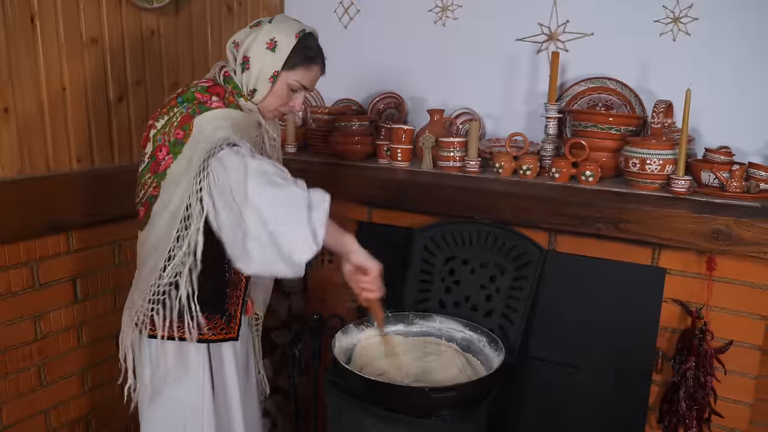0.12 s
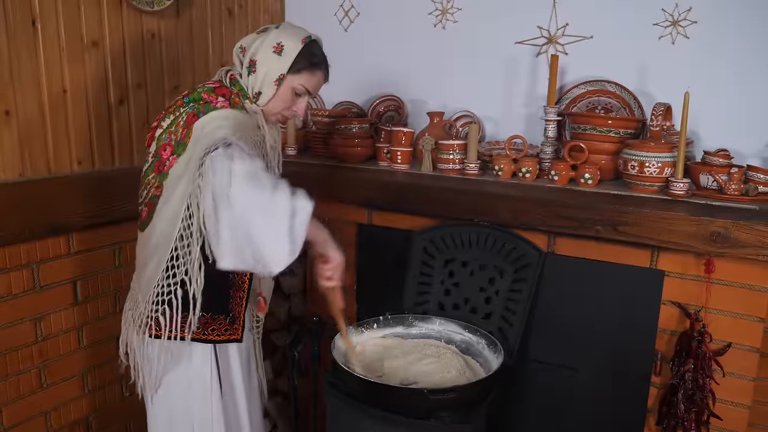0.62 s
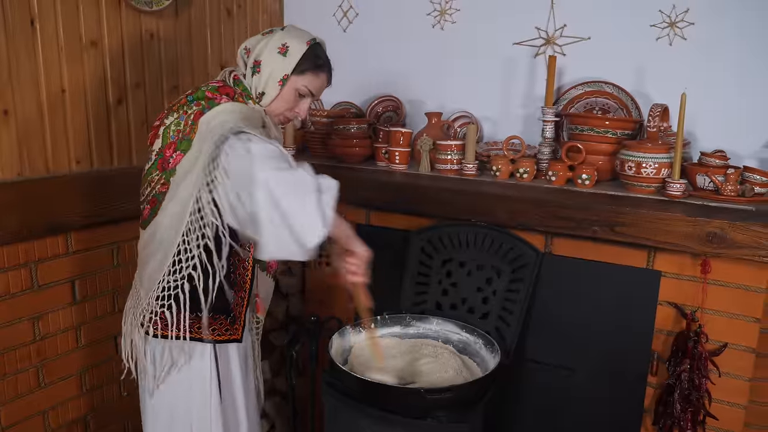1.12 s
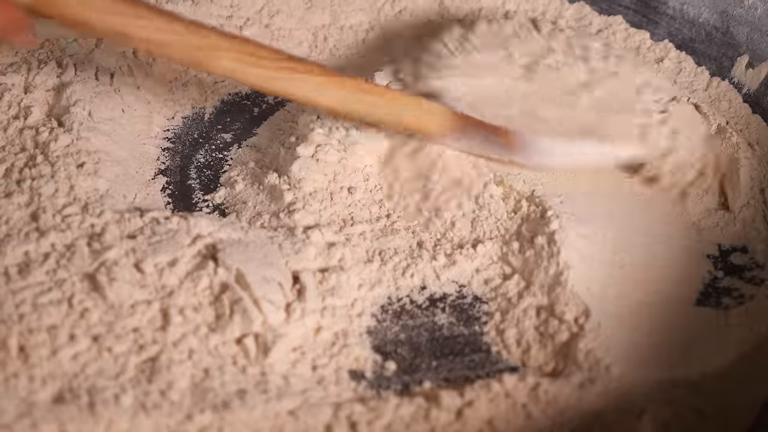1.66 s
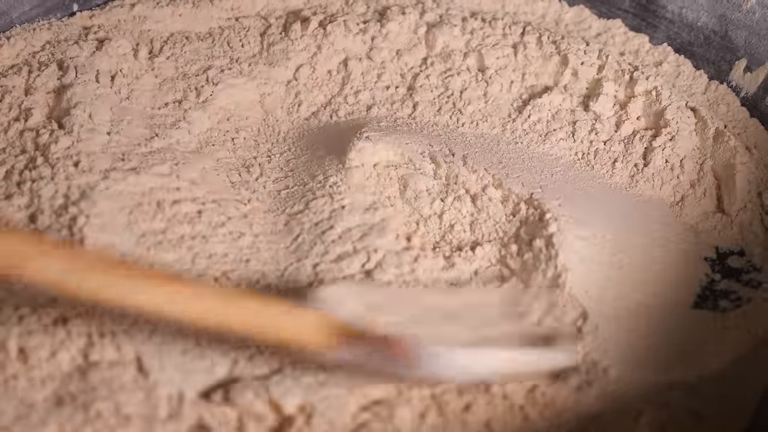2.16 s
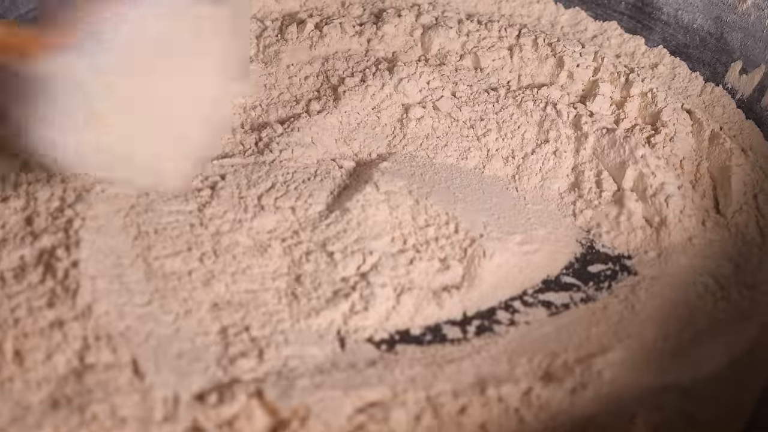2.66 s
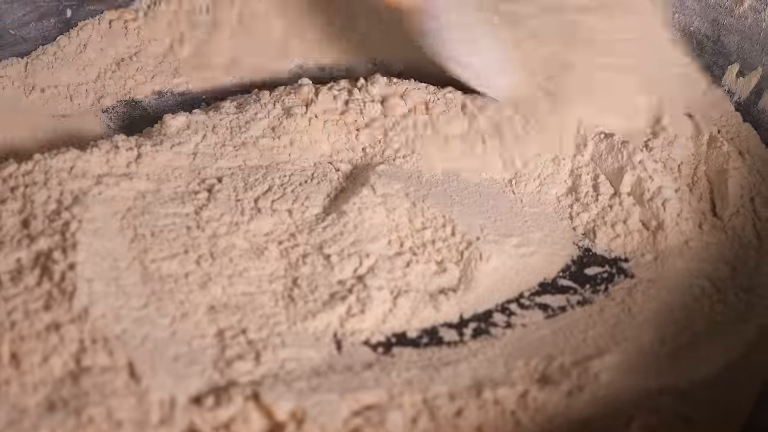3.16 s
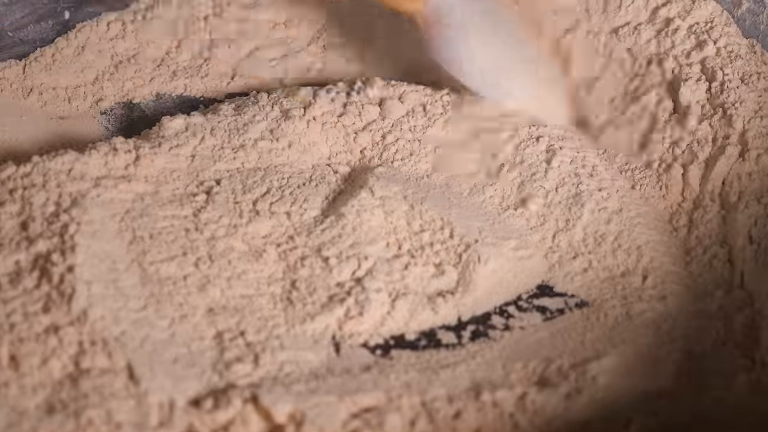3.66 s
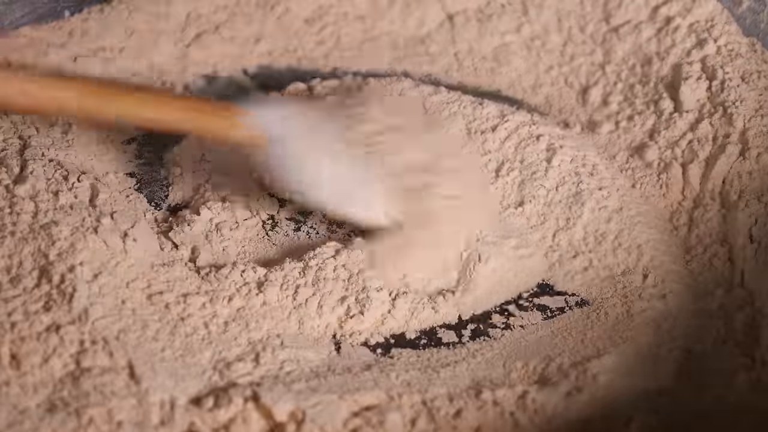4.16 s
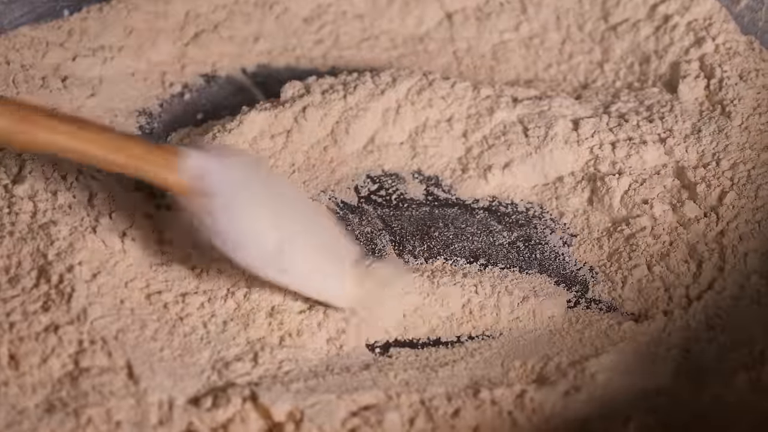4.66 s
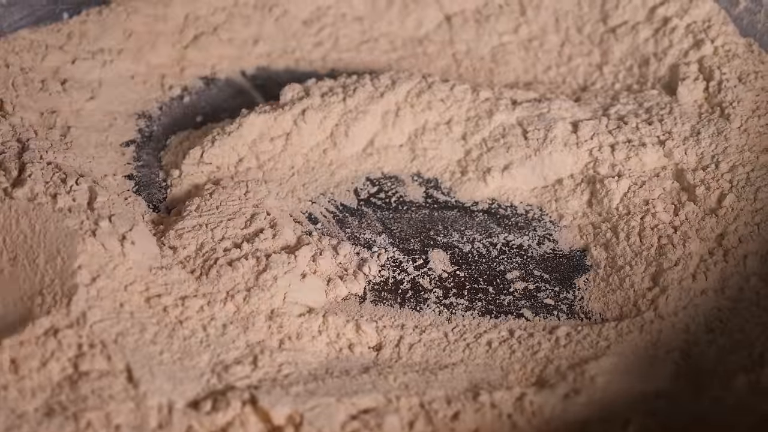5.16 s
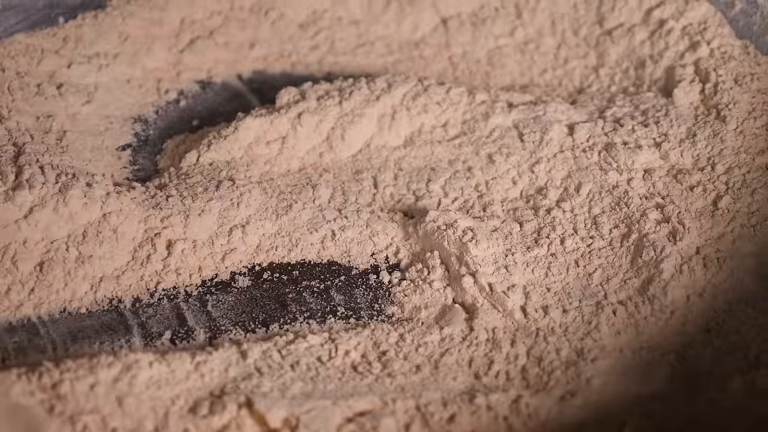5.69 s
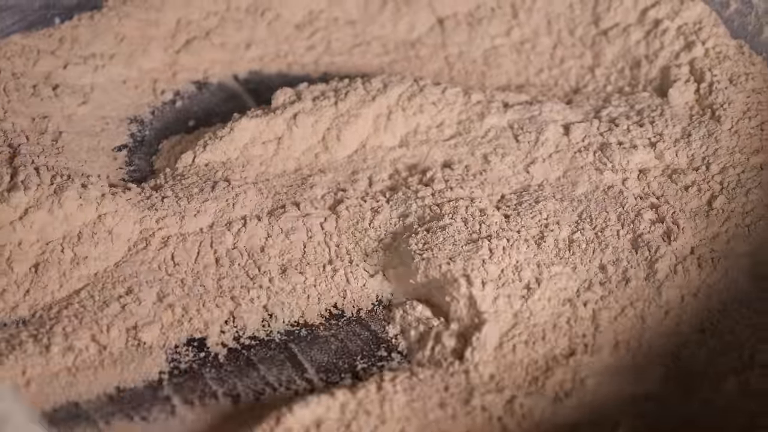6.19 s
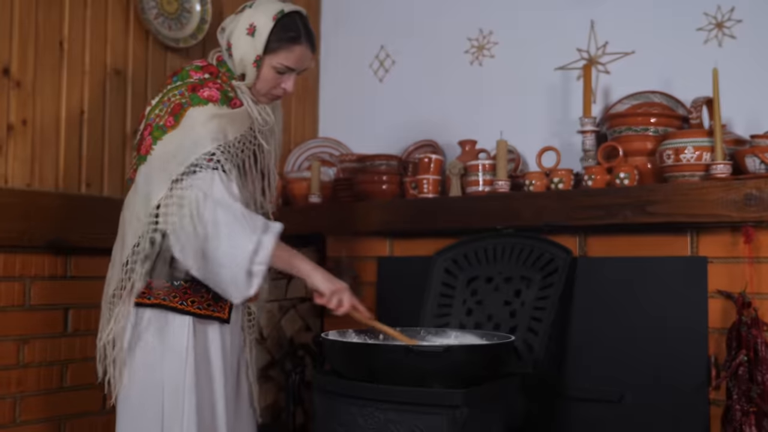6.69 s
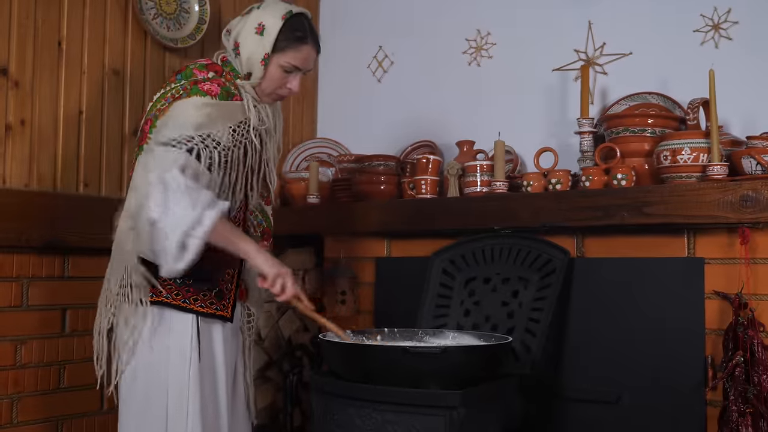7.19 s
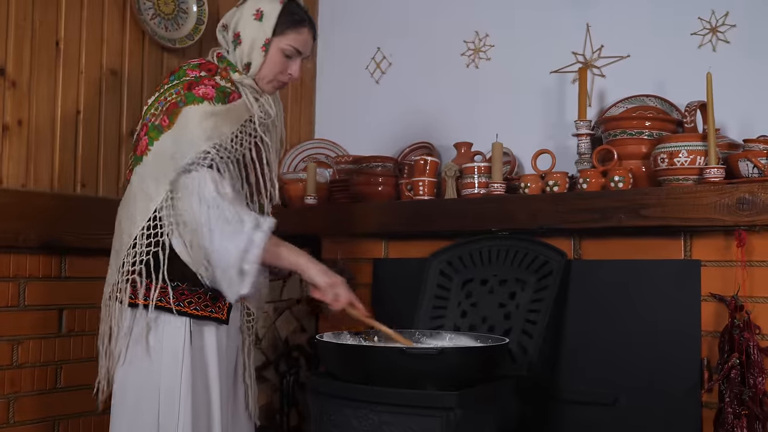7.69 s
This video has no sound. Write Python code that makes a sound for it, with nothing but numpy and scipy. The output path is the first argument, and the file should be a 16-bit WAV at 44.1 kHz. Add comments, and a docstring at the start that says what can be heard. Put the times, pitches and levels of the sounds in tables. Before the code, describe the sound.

A wooden spoon stirs dry flour in a wide iron pan, heard close in a quiet kitchen. Muted rasping strokes begin, break off briefly, then resume faintly. Before three seconds a hard hollow knock starts a louder run of gritty scrapes. Sharp knocks and juddering drags follow after five seconds, each trailing a thin metallic ring, before the stirring softens.

```python
"""In a quiet kitchen a wooden spoon stirs dry flour in a wide iron pan. Knocks and stick-slip judder ring the
damped modes of spoon and pan; the edge rasps on the iron. Crushed flour hisses as coloured noise, and a few
thin wall tones ring on when the spoon leaves bare iron. Crumbs tick, a sparse echo follows the pan and faint
room noise lies beneath; once, for a moment, the pan and its echo fall silent."""
import sys
import numpy as np
from scipy import signal
from scipy.fft import rfft, irfft
from scipy.io import wavfile
from scipy.ndimage import uniform_filter1d

SR = 44100
rng = np.random.default_rng(int(sys.argv[2]) if len(sys.argv) > 2 else 0)


def digitize_waveform(pressure):
    """Quantize a signal to 16-bit integers and store it at the path in sys.argv[1].

    Rows of a 2-D input are taken as channels; values are limited to [-1, 1].
    """
    field = np.atleast_2d(pressure).T
    bounded = np.clip(field, -1, 1)
    quanta = np.round(bounded * 32767).astype(np.int16)
    wavfile.write(sys.argv[1], SR, quanta)


def invert_db(level):
    """Linear amplitude ratio for a level in decibels (20 dB per decade), elementwise."""
    return 10 ** (np.asarray(level, dtype=float) / 20)


N = 344862

# damped low modes of spoon and pan: (frequency [Hz], relative level [dB], t60 [s])
BODY_MODES = [(170, -4.5, 0.061), (242, -0.5, 0.04), (361.6, 3, 0.037), (487, 2.5, 0.037), (659, 2, 0.023),
              (818, 3.5, 0.013), (1016, 5.5, 0.017), (1180, 2, 0.016)]


def evened(x):
    """Normalisation of power: scales to rms 1."""
    return x / np.sqrt(np.mean(x ** 2) + 1e-20)


def read(points, hz):
    """Interpolates a spectrum on a log-frequency axis, as pitch is heard."""
    f, value = np.transpose(points)
    return np.interp(np.log(hz + 1), np.log(f + 1), value)


def peaks_db(peaks, hz):
    """Resonance curves: bell-shaped lifts of a spectrum."""
    return sum(db / (1 + (2 * (hz - f) / width) ** 2) for f, width, db in peaks)


def ring(x, hz, t60):
    """One damped oscillator (two-pole resonator); steady white noise of rms 1 comes out at rms 1."""
    r = 10 ** (-3 / (t60 * SR))
    turn = 2 * np.pi * hz / SR
    gain = np.sin(turn) * np.sqrt(2 - 2 * r * r)
    return signal.lfilter([0, gain], [1, -2 * r * np.cos(turn), r * r], x)


def contact(x, width_s):
    """Contact compliance: wood gives a little, so each click becomes a soft push."""
    push = np.hanning(round(width_s * SR) + 2)
    push = push / push.sum() * np.ones(x.shape[:-1] + (1,))
    return signal.oaconvolve(x, push, axes=-1)[..., :N]


def thin(x, hz):
    """Inefficient radiation at long wavelengths: a small pan radiates no deep bass."""
    return signal.sosfilt(signal.butter(4, hz, "high", fs=SR, output="sos"), x)


def wander(span_s):
    """Low-pass random process: slow chance of rms 1."""
    steps = rng.standard_normal(N // 128 + 2)
    width = max(round(span_s * SR / 128), 1)
    smooth = uniform_filter1d(uniform_filter1d(steps, width), width)
    return np.interp(np.arange(N) / 128, np.arange(len(steps)), evened(smooth))


def coloured(gain_db, patchy_db, flicker_db):
    """Filtered noise: random short-time spectra with drifting patches and a flicker shared by all pitches."""
    frames = N // 128 + 5
    real, imaginary, patches = rng.standard_normal((frames, 257, 3)).T
    patches = evened(uniform_filter1d(uniform_filter1d(patches, 5, axis=0), 20, axis=1))
    flicker = evened(uniform_filter1d(rng.standard_normal(frames), size=2))
    level_db = gain_db[:, None] + patchy_db * patches + flicker_db * flicker
    spectra = (real + 1j * imaginary) * invert_db(level_db)
    return evened(signal.istft(spectra, nperseg=512, noverlap=384)[1][:N])


def air():
    """Coloured noise: faint room and microphone noise, swaying slightly in level."""
    # noise spectrum: (frequency [Hz], relative density [dB per Hz])
    spectrum = [(12, -44), (20, 10), (37, -20), (53, -2.5), (74, 1), (134, -4.5), (172, -3.5), (255, -9),
                (738, -16), (1000, -15.5), (1220, -19.5), (14700, -33), (16000, -47)]
    # faint fuzzy bands: (frequency [Hz], width [Hz], lift [dB])
    murk = [(60.6, 22, 5.5), (83.5, 36, 1.5), (128, 16, 4.5), (2880, 180, 3)]
    level_db, sway_db = -57, 1.8
    hz = np.fft.rfftfreq(N, 1 / SR)
    gain = invert_db(read(spectrum, hz) + peaks_db(murk, hz))
    noise = evened(irfft(rfft(rng.standard_normal(N)) * gain, N))
    return invert_db(level_db + sway_db * wander(0.081)) * noise


def kitchen(x):
    """Diffuse reverberation: sparse reflections of random sign, dying away and duller than the direct sound."""
    t60_s, spacing = 0.23, 22  # spacing in samples
    taps, at = np.zeros(SR // 2), np.arange(200, SR // 2 - spacing, spacing)
    signs = rng.choice([-1., 1.], len(at))
    taps[at + rng.integers(0, spacing, len(at))] = signs * invert_db(-60 * at / SR / t60_s)
    taps = signal.lfilter([1], [1, -.5], taps)
    return signal.oaconvolve(x, taps / np.linalg.norm(taps))[:N]


def ticks():
    """Impact noise of falling crumbs: each tick is a broad, quickly decaying burst."""
    # dry ticks: (time [s], level [dB], centre [Hz])
    crumbs = [(0.1044, -42, 2010), (1.3474, -47.5, 3360), (2.495, -32, 3190), (2.5114, -50, 2590),
              (2.6725, -52, 6230), (5.074, -52, 4900), (5.0844, -53, 3210), (5.1038, -51.5, 4020),
              (5.1555, -55, 2020), (5.5933, -43, 2900), (5.659, -24, 2300)]
    out, t = np.zeros(N), np.arange(300) / SR
    bursts = rng.standard_normal((len(crumbs), len(t)))
    for (s, db, hz), burst in zip(crumbs, bursts):
        decay = invert_db(db - 5.5 - 60 * t / .012)
        out[round(s * SR):][:len(t)] += decay * ring(burst, hz, t60=2.1 / hz)
    return out


def bump():
    """Heavily damped oscillation: one soft low tone that dies at once."""
    start_s, level_db, hz, t60_s = 2.512, -42, 170, .14
    t = np.maximum(np.arange(N) / SR - start_s, 0)
    onset = np.minimum(t / 0.0035, 1)
    return invert_db(level_db - 60 * t / t60_s) * np.sin(2 * np.pi * hz * t) * onset


def wall():
    """Free modal decay: as the spoon leaves bare iron, thin tones swell in and die until they are damped."""
    # modes of the pan's free wall: (frequency [Hz], relative level [dB], t60 [s])
    wall_modes = [(322, -3, 1.2), (495, 0.5, 0.2), (646, -10, 0.39), (694, -1.5, 0.74), (720, -4, 0.43),
                  (980, -11.5, 1.44), (1020, -9, 0.17), (1370, 5, 0.2), (1610, 1, 0.46), (1715, 3, 0.3),
                  (1803, -5, 0.5)]
    # spoon leaves the iron: (time [s], level [dB], favoured mode [Hz], its lift [dB], damped at [s])
    lifts = [(4.9, -59, 694, 1, 5.19), (5.39, -47.5, 980, 14, 5.72), (5.921, -44, 694, 5.5, 6.21),
             (6.44, -46, 495, 17, 6.6)]
    out = np.zeros(N)
    for s, db, favoured_hz, lift_db, end in lifts:
        t = np.arange(round((end - s) * SR)) / SR
        tones = np.zeros(len(t))
        for hz, mode_db, t60 in wall_modes:
            favour_db = lift_db / (1 + ((hz - favoured_hz) / 20) ** 2)
            decay = invert_db(mode_db + favour_db - 60 * t / t60)
            tones += decay * np.sin(2 * np.pi * (hz * t + rng.random()))
        fade = np.minimum(1, np.minimum(t / 0.0085, (t[-1] - t) / 0.0046))
        out[round(s * SR):][:len(t)] += invert_db(db) * tones * fade
    return out


def powder(coarse, fine, cracks):
    """Granular friction: flour crushed under the edge gives coarse and fine hiss, and a dull puff at each crack."""
    # hiss spectrum: (frequency [Hz], relative density [dB per Hz])
    spectrum = [(880, -34.5), (1500, -2.5), (2120, -1.5), (2610, -14.5), (4080, -4), (4780, -6.5),
                (8920, -14.5), (12100, -18.5), (16000, -22)]
    # resonances over the hiss: (frequency [Hz], width [Hz], lift [dB])
    resonances = [(2880, 830, 10), (3650, 90, 1), (3750, 90, 4), (4146, 310, 6), (5380, 150, 1),
                  (6700, 670, 3), (9060, 1100, 5), (11980, 1000, 6)]
    hz = np.fft.rfftfreq(512, 1 / SR)
    gain_db = read(spectrum, hz) + peaks_db(resonances, hz)
    # power share of the upper hiss, crossing over at 6.5 kHz
    upper = np.clip(1 / (1 + (6500 / (hz + 1)) ** 8), 1e-5, 1 - 1e-5)
    puffs = signal.lfilter([1], [1, -np.exp(-1 / (0.0021 * SR))], cracks)
    lower_hiss = coloured(gain_db + 10 * np.log10(1 - upper), patchy_db=3.5, flicker_db=-1.5)
    upper_hiss = coloured(gain_db + 10 * np.log10(upper), patchy_db=2.5, flicker_db=1.2)
    return (coarse + invert_db(-30.5) * puffs) * lower_hiss + (fine + invert_db(-72) * puffs) * upper_hiss


def hops(speed):
    """Intermittent contact: the edge hops and the hiss breaks off, more often the faster it runs."""
    hops_per_s, hop_s, mean_hop_db = 12, 0.0011, -11
    big_hop_at_s, big_hop_s, big_hop_db = 3.899, .005, -20
    chance = hops_per_s / SR * np.minimum(speed / invert_db(-34), 1)
    depth = (rng.random(N) < chance) * rng.exponential(1, N)
    dip = np.exp(-(np.arange(-400, 401) / SR / hop_s) ** 2)
    big_dip = np.exp(-((np.arange(N) / SR - big_hop_at_s) / big_hop_s) ** 2)
    return invert_db(mean_hop_db * signal.oaconvolve(depth, dip, "same") + big_hop_db * big_dip)


def hand():
    """Friction drive: pressure feeds the judder, speed the hiss, both the rasp; the ringing pitch glides."""
    # points along each stroke: (time [s], pressure as judder level [dB], speed as hiss level [dB])
    strokes = [
        [(0.042, -20, -38.5), (0.054, -28, -44), (0.09, -43, -52), (0.234, -32.5, -34.5), (0.292, -36, -43.5),
         (0.334, -46.5, -43), (0.368, -35, -47.5), (0.44, -38.5, -51.5), (0.5, -51, -56)],
        [(0.5, -56, -56), (0.51, -34, -57), (0.53, -40.5, -51.5), (0.6, -38, -39), (0.89, -36, -37.5),
         (0.97, -48, -55.5)],
        [(0.97, -48, -56), (1.048, -30.5, -36.5), (1.056, -34, -40), (1.078, -30, -37), (1.168, -38.5, -39.5),
         (1.19, -37, -39.5)],
        [(1.41, -78, -80), (1.416, -53, -51), (1.43, -39, -50.5), (1.544, -62, -57.5), (1.6, -69, -66.5),
         (1.88, -57, -53)],
        [(1.88, -57, -56), (1.936, -29, -32), (1.978, -58.5, -68), (2.0, -48, -77)],
        [(2.0, -53, -64), (2.01, -55, -49), (2.082, -50, -50.5), (2.134, -35, -41), (2.202, -42.5, -38),
         (2.3, -34, -41.5), (2.33, -37.5, -40), (2.44, -40.5, -46.5)],
        [(2.44, -47, -48), (2.448, -56, -54), (2.5, -51, -61), (2.56, -90, -95)],
        [(2.815, -10, -41), (2.831, -39, -45), (2.865, -39, -48), (2.871, -19, -41.5), (3.029, -15, -26.5),
         (3.039, -12, -29.5), (3.065, -16.5, -32.5), (3.239, -19.5, -43.5), (3.253, -32, -44),
         (3.275, -21, -39), (3.393, -31, -39.5), (3.46, -56.5, -62)],
        [(3.46, -55, -59), (3.506, -35.5, -39.5), (3.538, -30.5, -31.5), (3.67, -24.5, -37),
         (3.674, -28.5, -36.5), (3.86, -28, -32.5), (3.872, -24.5, -29), (4.018, -34, -34.5), (4.06, -47, -47)],
        [(4.06, -47, -45), (4.1, -26, -36.5), (4.188, -21, -31), (4.304, -27, -37), (4.33, -36.5, -36),
         (4.38, -47, -49.5)],
        [(4.38, -45.5, -52.5), (4.444, -38, -35), (4.516, -25.5, -28.5), (4.522, -32, -26.5),
         (4.608, -29.5, -32.5), (4.66, -49, -45.5)],
        [(4.66, -46, -49), (4.702, -28, -33), (4.784, -34, -33), (4.792, -26.5, -34), (4.828, -38, -37.5),
         (4.86, -53, -55)],
        [(4.86, -48, -59), (4.884, -40, -34.5), (4.902, -49, -34.5), (4.922, -51, -67), (4.97, -57, -64.5)],
        [(5.195, -27, -34.5), (5.211, -42, -40.5), (5.237, -18.5, -36.5), (5.331, -18.5, -33),
         (5.389, -20, -39), (5.431, -43.5, -56), (5.537, -52, -100), (5.6, -67, -68)],
        [(5.724, -14.5, -31), (5.734, -25, -38), (5.752, -19, -37), (5.79, -15.5, -30), (5.888, -15, -33.5),
         (5.896, -28.5, -34), (5.994, -46.5, -68), (6.15, -64, -65)],
        [(6.208, -19, -44), (6.222, -37, -40), (6.232, -19.5, -38.5), (6.344, -15, -31), (6.358, -13, -30),
         (6.422, -17.5, -35), (6.46, -38.5, -40), (6.58, -49, -102)],
        [(6.59, -36, -47), (6.594, -28, -42), (6.646, -28, -40), (6.78, -33.5, -41.5), (6.9, -50, -59.5)],
        [(6.9, -48, -60), (6.958, -42.5, -45.5), (7.042, -37.5, -39), (7.216, -35, -47.5), (7.3, -51, -58)],
        [(7.3, -49, -64), (7.372, -32, -48), (7.526, -29.5, -41.5), (7.598, -37, -50), (7.66, -48, -64)],
        [(7.66, -42, -61), (7.692, -42, -49), (7.722, -41, -44), (7.768, -33.5, -41), (7.82, -38, -41.5)],
    ]
    # path of each stroke: (ringing from [Hz], to [Hz], rasp offset [dB], fine hiss offset [dB],
    # weight on the pan floor as lift of the lowest modes [dB])
    paths = [(1130, 450, 9.5, -11.5, 1), (775, 1050, 3, -10, 12), (950, 1000, -2, -11, -26),
             (890, 930, 3.5, -5.5, 17), (470, 420, -9.5, -10, 5), (544, 960, 5, -10.5, 8.5),
             (790, 430, 3, -6, 0), (1050, 430, 4.5, -5.5, -10), (700, 840, -2, -3.5, 14),
             (700, 340, 5.5, -6.5, -5), (760, 250, -2, 0, -3), (375, 560, 5, -3.5, 5),
             (555, 520, -5, -4.5, 16), (834, 570, 5, -5.5, 6.5), (860, 260, 6.5, -7, -1.5),
             (820, 480, 6, -5, -27), (865, 890, 4.5, -12, 1), (1000, 370, 1.5, -9, 10.5),
             (834, 670, 8, -11.5, 0), (890, 710, 3.5, -9, -10)]
    rasp_from_pressure = 0.42  # the rest of the rasp follows speed
    rasp_db_per_octave = 3  # where the pan rings higher the edge rasps harder
    fine_per_speed, usual_speed_db = 0.95, -46.5  # dB of fine hiss per dB of speed, about the usual
    t = np.arange(N) / SR
    gains, centre_hz, weight_db = np.zeros((4, N)), np.full(N, 700.), np.zeros(N)
    for rows, (from_hz, to_hz, rasp_offset_db, fine_offset_db, heft_db) in zip(strokes, paths):
        s, pressure, speed = np.transpose(rows)
        on = slice(round(s[0] * SR), round(s[-1] * SR))
        pressure_db = np.interp(t[on], s, pressure)
        speed_db = np.interp(t[on], s, speed)
        hz = np.interp(t[on], s[[0, -1]], [from_hz, to_hz])
        rasp_db = rasp_offset_db + rasp_db_per_octave * np.log2(hz / np.sqrt(from_hz * to_hz))
        rasp_db += rasp_from_pressure * pressure_db + (1 - rasp_from_pressure) * speed_db
        fine_db = fine_offset_db + usual_speed_db + fine_per_speed * (speed_db - usual_speed_db)
        gains[:, on] = invert_db(np.array([pressure_db, rasp_db, speed_db, fine_db]))
        centre_hz[on], weight_db[on] = hz, heft_db
    gains = uniform_filter1d(gains, 150, axis=1)
    # the edge keeps skipping for an instant: brief random dips in both hisses
    gains[2:] *= invert_db(-2.2 * np.maximum(wander(.003), 0) ** 2)
    gains[1:] *= hops(gains[2])
    return gains, centre_hz, weight_db


def slips(per_s, spread_db, grit):
    """Stick-slip friction: sparse slips of very uneven size over a continuous gritty drag."""
    size = invert_db(spread_db * np.minimum(rng.exponential(1, N), 3)) * rng.choice([-1., 1.], N)
    sparse = evened(size * (rng.random(N) < per_s / SR))
    return evened((1 - grit) * sparse + grit * rng.standard_normal(N))


def near(modes, centre_hz, fall_db, drift_db=0):
    """Modal excitation by position: contact favours modes near its own pitch, least those far below."""
    shares = []
    for hz, db, _ in modes:
        octaves = np.log2(hz / centre_hz)
        shares.append(invert_db(db - fall_db * np.maximum(octaves, -1.8 * octaves)))
    share = np.array(shares) * invert_db(drift_db)
    return share / np.sqrt((share ** 2).sum(0))


def knocks():
    """Impulsive excitation: pushes for the low modes, each landing elsewhere, and sharper cracks for the upper."""
    # knocks, ticks and hardest slips: (time [s], level [dB], favoured pitch [Hz], crack re level [dB])
    blows = [(0.037, -12, 1260, 2), (0.508, -27, 912, 2), (1.423, -39.5, 930, 11), (1.92, -24, 468, -10.5),
             (2.505, -44, 175, -21), (2.809, 2.5, 980, -15), (2.871, 0.5, 1100, -34),
             (2.893, -18, 1180, -17), (2.944, -5, 1100, -22), (2.978, -2, 675, -17),
             (3.035, -5, 490, -12.5), (3.138, -19.5, 850, -28), (3.232, -13, 643, -25),
             (3.283, -5.5, 483, -33), (3.496, -26, 1250, 3), (3.888, -10, 355, -26.5),
             (4.098, -19, 328, -22), (4.195, -8.5, 487, -14.5), (4.569, -10.5, 484, -22),
             (5.19, -3, 365, -24.5), (5.227, -9, 1050, -28), (5.246, -4.5, 1030, -32), (5.321, 1, 925, -22),
             (5.354, -7.5, 646, -20), (5.656, -29.5, 700, -12), (5.719, 1, 560, -24), (5.772, -9, 860, -17),
             (5.792, -19, 1090, -17), (5.817, -11, 872, -8), (5.834, -12, 659, -26),
             (6.204, -4.5, 317, -24), (6.232, -6.5, 810, -20), (6.36, -13, 1050, -28),
             (6.412, 0, 1030, -49), (6.591, -22, 1130, -21), (7.346, -30, 970, -20)]
    low, high = np.zeros((len(BODY_MODES), N)), np.zeros(N)
    places = rng.standard_normal((len(blows), len(BODY_MODES)))
    for (s, level_db, hz, crack_db), place in zip(blows, places):
        at = round((s + 0.0009) * SR)  # flour cushions the first moment
        low[:, at] += invert_db(level_db + 12) * near(BODY_MODES, hz, fall_db=10.5, drift_db=8.0 * place)
        high[at] += invert_db(level_db + crack_db + 18)
    # the edge rebounds and strikes again
    low = low + 0.42 * np.roll(low, round(0.00216 * SR), axis=1)
    high = high + 0.24 * np.roll(high, round(0.00221 * SR))
    return contact(low, 0.00075), contact(high, 0.00005)


def pan():
    """Modal synthesis: slips and knocks ring the damped modes of spoon and pan, joined by powder and wall."""
    # upper modes stirred by the rasping edge: (frequency [Hz], relative level [dB], t60 [s])
    edge_modes = [(1390, -11.5, 0.033), (1612, 1, 0.021), (1788, 1, 0.017), (1966, -4.5, 0.013),
                  (2155, -8, 0.031)]
    (judder, rasp, coarse, fine), centre_hz, weight_db = hand()
    low, high = knocks()

    # pressed hard, the edge catches in fewer, larger slips
    catch_share, catch_from_db = .55, -24  # greatest share of power; judder level at half of it
    drag = contact(slips(450, spread_db=3, grit=0.38), 0.0001)
    catches = contact(slips(190, spread_db=2.5, grit=0), 0.00024)
    catches = evened(catches) * np.std(drag)
    catching = catch_share * judder ** 2 / (judder ** 2 + invert_db(catch_from_db) ** 2)
    friction = np.sqrt(1 - catching) * drag + np.sqrt(catching) * catches

    # weight on the pan floor acts on the modes below about 330 Hz
    drift_db = np.array([1.85 * wander(0.034) + weight_db / (1 + (hz / 330) ** 4) for hz, _, _ in BODY_MODES])
    pushes = judder * friction * near(BODY_MODES, centre_hz, fall_db=5.0, drift_db=drift_db)
    body, blows = np.zeros(N), np.zeros(N)
    for k, (hz, _, t60) in enumerate(BODY_MODES):
        body += ring(pushes[k], hz, t60) * (-1) ** k  # neighbouring modes have opposite sign
        blows += ring(low[k], hz, t60)

    scrape = rasp * (.5 * friction + 0.56 * evened(rng.standard_normal(N)))
    edge = np.zeros(N)
    for hz, db, t60 in edge_modes:
        uneven_scrape = scrape * invert_db(5.5 * wander(0.052))
        edge += invert_db(db - 12.0) * ring(uneven_scrape + high, hz, t60)
    stirring = body + edge + powder(coarse, fine, high)
    return thin(stirring, hz=181.5) + thin(blows, hz=180) + wall() + bump()


def scene():
    """Superposition of the pan, its echo in the kitchen, crumbs and the air."""
    close = pan()
    close = close + invert_db(-15.5) * kitchen(close)
    hush_from_s, hush_to_s = 1.193, 1.41  # pan and echo stop short; crumbs and air go on
    close[round(hush_from_s * SR):round(hush_to_s * SR)] = 0
    return (close + ticks() + air())[None]


def top_cut(x):
    """Nothing passes above the cut-off."""
    return signal.sosfilt(signal.butter(12, 15950, fs=SR, output="sos"), x)


def record(dry):
    """Band limitation: the finished mix loses its highest treble."""
    return top_cut(dry)


dry = scene()
out = record(dry)
digitize_waveform(out)
```